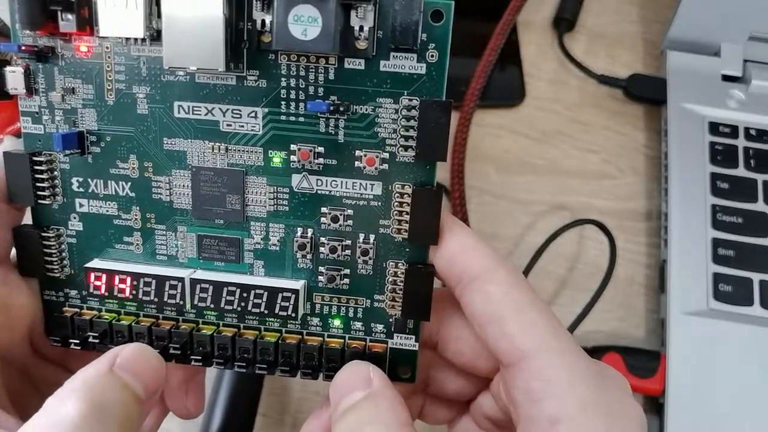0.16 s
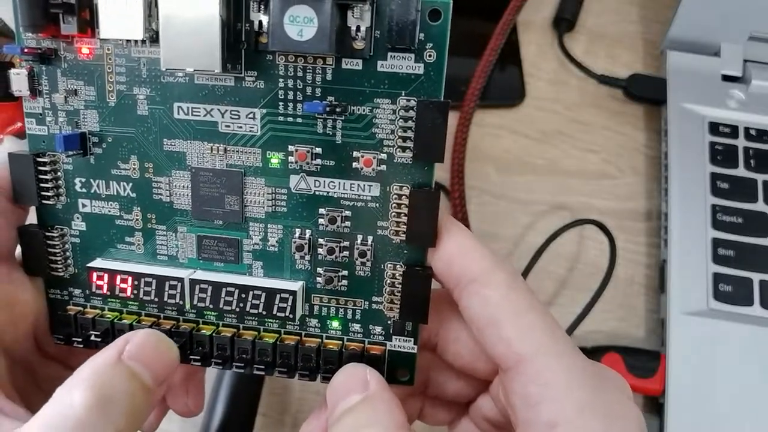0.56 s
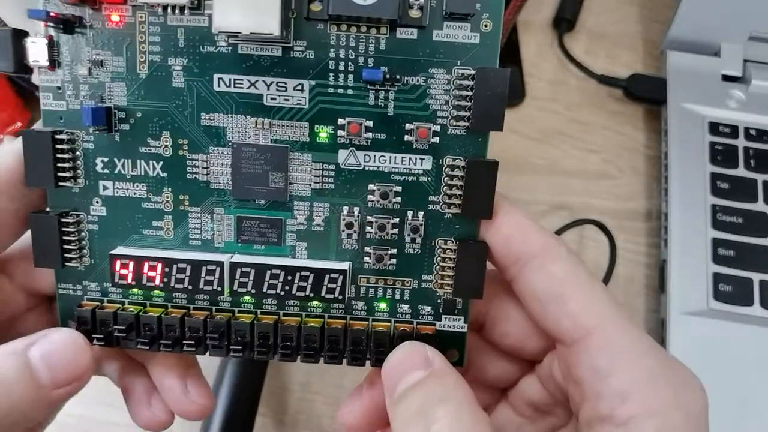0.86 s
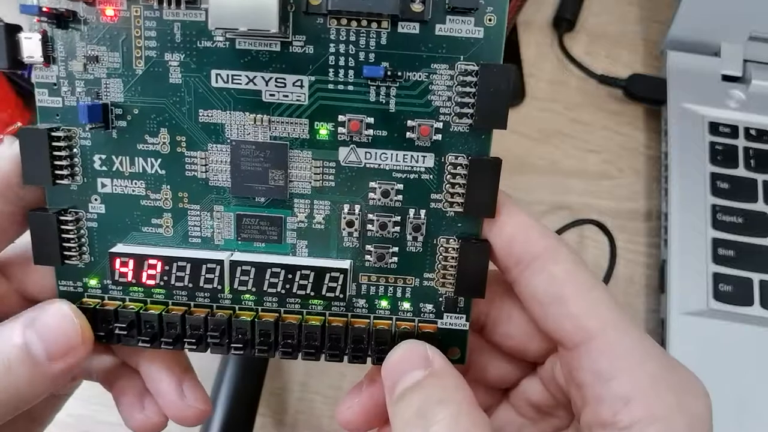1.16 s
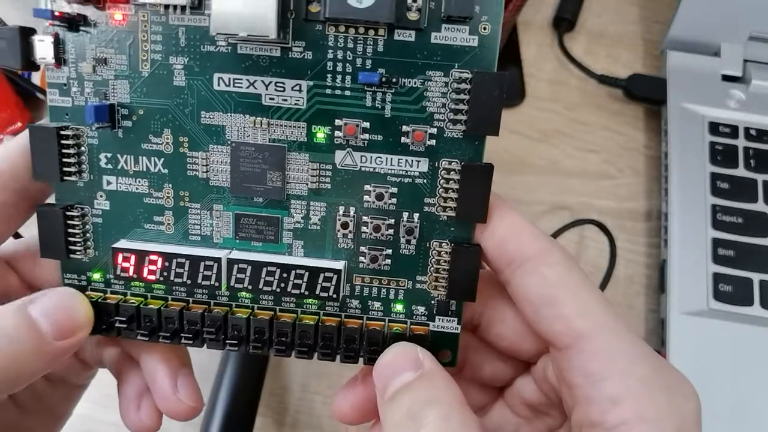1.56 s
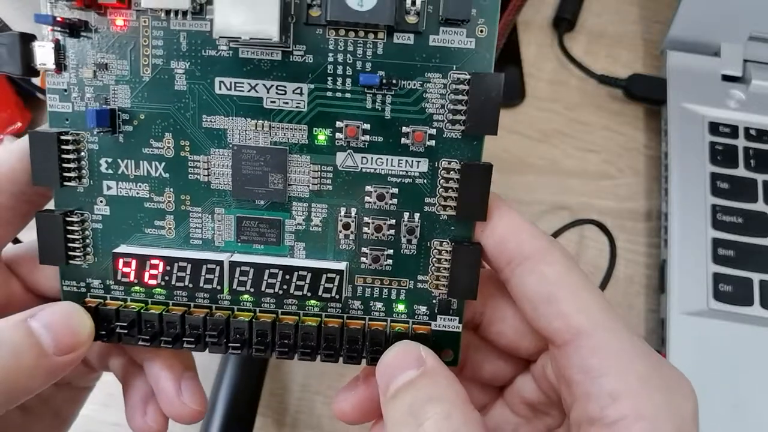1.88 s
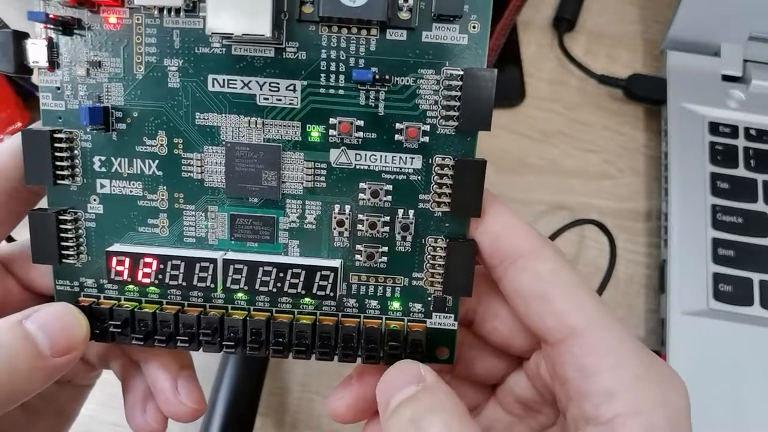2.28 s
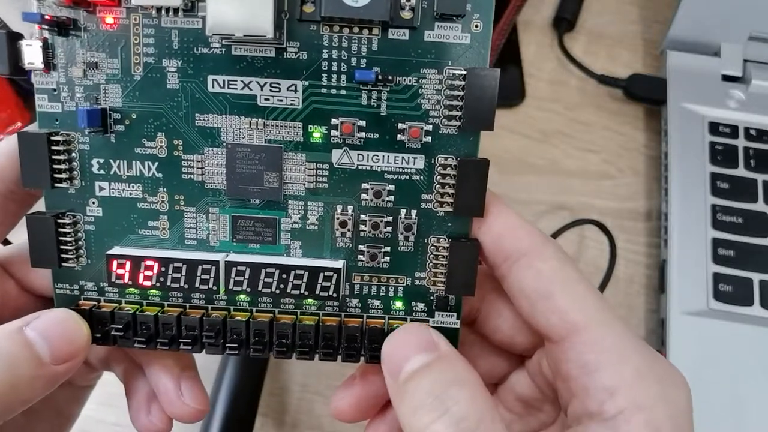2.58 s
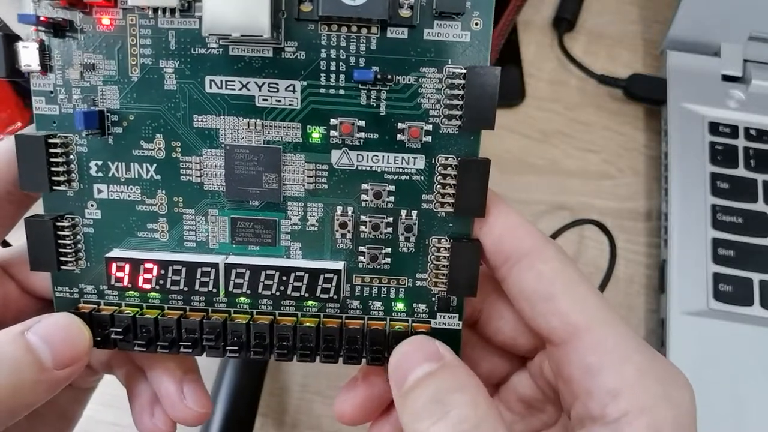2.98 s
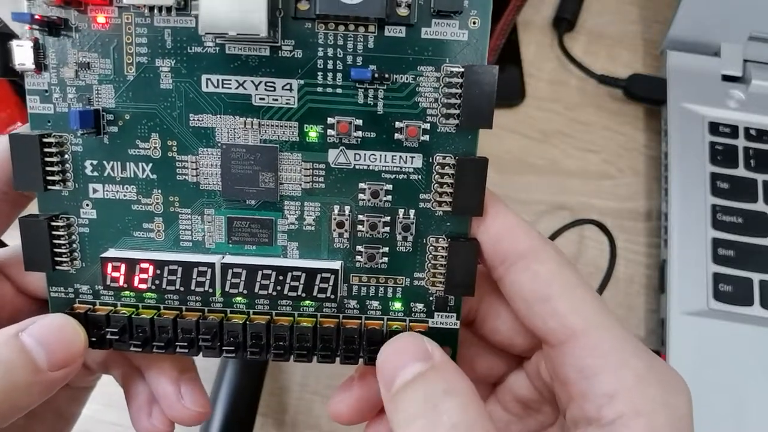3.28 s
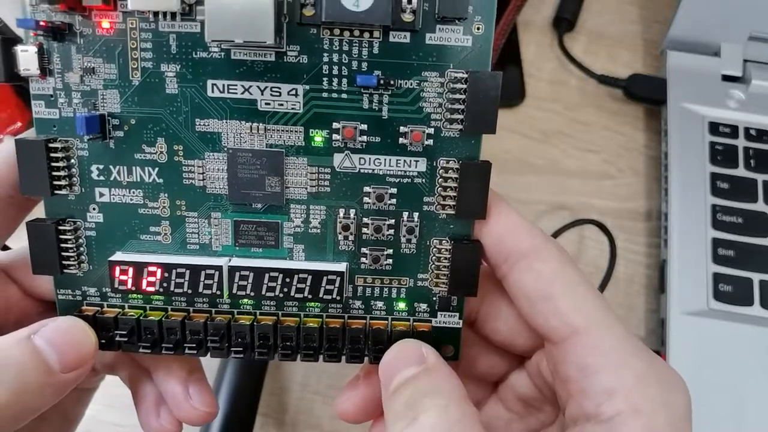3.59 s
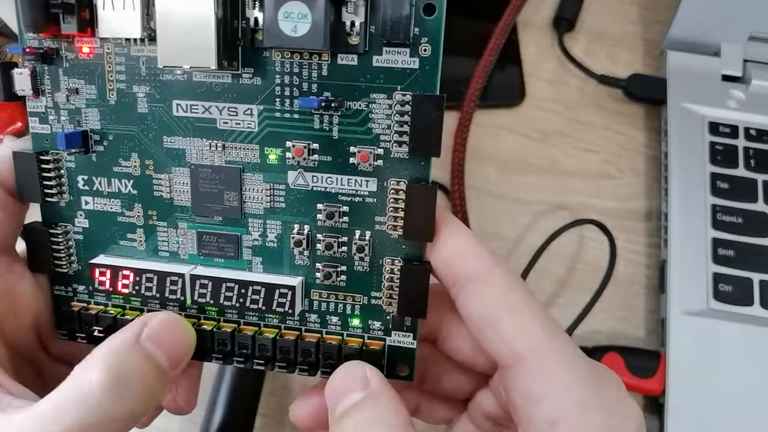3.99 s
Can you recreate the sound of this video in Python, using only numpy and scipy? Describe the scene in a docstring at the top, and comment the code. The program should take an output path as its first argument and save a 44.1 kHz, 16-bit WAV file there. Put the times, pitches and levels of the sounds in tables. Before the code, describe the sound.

A quiet low hum and the soft rush of ventilation fill a small room. Close to the microphone, little slide switches on a circuit board snap over: two crisp, bright clicks with faint ticks around them, a gap, then a third click. Skin barely brushes the board before the first click and after the last, and the room adds a short reverberation.

```python
"""In a small room, tiny slide switches are flipped by thumb on a hand-held circuit board near the microphone.
A faint mains hum, two low drones and the rumble, air noise and fan of the ventilation sound throughout.
Skin brushes the board before and after the flips, making friction noise. Each slider scrapes, snaps over
its detent and hits its end stop; the impacts excite the board's damped modes, and the room reverberates."""
import sys
import numpy as np
from scipy import signal
from scipy.fft import rfft, irfft, next_fast_len
from scipy.io import wavfile
from scipy.ndimage import uniform_filter1d

SR = 44100
rng = np.random.default_rng(int(sys.argv[2]) if len(sys.argv) > 2 else 0)


def generate_wav(signal):
    """Clip the signal to [-1, 1] and save it as 16-bit WAV at the path in sys.argv[1]."""
    frames = np.transpose(np.atleast_2d(signal))
    scaled = np.clip(frames, -1, 1) * 32767
    pcm = np.round(scaled).astype(np.int16)
    wavfile.write(sys.argv[1], SR, pcm)


N = 182574
TIME = np.arange(N) / SR
EARS = np.array([[.5], [-.5]])  # each ear's share of a left-minus-right (L-R) difference


def undb(db):
    """Amplitude ratio of a level in decibels."""
    return 10 ** (np.asarray(db) / 20)


def unit(x):
    """Normalisation to rms 1."""
    return x / np.sqrt(np.mean(x ** 2))


def across(rows, hz, column=1):
    """Interpolation of a table column over log frequency."""
    rows = np.array(rows)
    return np.interp(np.log(np.maximum(hz, 1)), np.log(rows[:, 0]), rows[:, column])


def shape(x, rows):
    """Minimum-phase filtering through points (f/Hz, gain/dB)."""
    size = 2 * next_fast_len(x.shape[-1])
    gain = undb(across(rows, np.fft.rfftfreq(size, 1 / SR)))
    cepstrum = irfft(np.log(gain))
    cepstrum[1:size // 2] *= 2
    cepstrum[size // 2 + 1:] = 0
    return irfft(rfft(x, size) * np.exp(rfft(cepstrum)))[..., :x.shape[-1]]


def balance(ears, rows):
    """Interaural level difference by frequency, from a table's last column."""
    return np.array([shape(ear, [(row[0], share * row[-1]) for row in rows])
                     for ear, share in zip(ears, EARS[:, 0])])


def fade(t, t60):
    """Exponential decay by 60 dB in t60 seconds, silent before t = 0."""
    return (t >= 0) * np.exp(-np.log(1000) * np.maximum(t, 0) / t60)


def walk(rate_hz):
    """Smoothed random steps: a slow drift of rms 1."""
    k = int(SR / rate_hz)
    steps = np.repeat(rng.standard_normal(N // k + 1), k)
    return unit(uniform_filter1d(uniform_filter1d(steps, k), k)[:N])


def bell(x, centre, width):
    """Gaussian curve of height 1."""
    return np.exp(-.5 * ((x - centre) / width) ** 2)


def swells(rows, steady_db, column=2):
    """Power addition of a steady level and Gaussian swells, returned as a gain."""
    power = sum((undb(row[column]) * bell(TIME, row[0], row[1])) ** 2 for row in rows)
    return np.sqrt(undb(steady_db) ** 2 + power)


def add(out, x, start_s):
    """Superposition of a sound from a given time on."""
    i = int(start_s * SR)
    out[:, i:i + x.shape[1]] += x[:, :N - i]


def tones(lines, waver_hz=7):
    """Sinusoids under random amplitude and phase modulation."""
    out = 0
    for hz, db, depth in lines:
        waver = 1 + depth * (walk(waver_hz) + 1j * walk(waver_hz))
        carrier = np.exp(2j * np.pi * (hz * TIME + rng.random()))
        out = out + undb(db) * unit(np.real(waver * carrier))
    return out


# the two drones: (f/Hz, relative level/dB, modulation depth)
LOW_DRONE = [(54.3, -0.87, .12)]
UPPER_DRONE = [(63.2, 1.5, 0.14)]
# their swells: (t/s, half length/s, low drone gain/dB, upper drone gain/dB)
DRONE_SWELLS = [(.04, .055, -35.5, -49), (.23, 0.043, -40, -52), (.62, 0.14, -41.5, -60),
                (3.25, 0.28, -47, -62), (3.85, 0.18, -51, -49.5)]
# mains overtones: (f/Hz, level/dB, modulation depth)
MAINS_LINES = [(102.7, -57, 0.28), (149.9, -60.5, 0.93)]


def hum(pan_db=3.5):
    """Beating: two swelling drones, close in frequency, interfere beneath the mains overtones."""
    low = tones(LOW_DRONE) * swells(DRONE_SWELLS, steady_db=-49.2)
    upper = tones(UPPER_DRONE) * swells(DRONE_SWELLS, steady_db=-62, column=3)
    ease_in = np.minimum(TIME / .004, 1)
    return ease_in * (low + upper + tones(MAINS_LINES)) * undb(pan_db * EARS)


# stereo image of the background noise: (f/Hz, side minus mid/dB, L-R/dB)
NOISE_IMAGE = [(58.5, -19, 0.5), (128.5, -19.5, -1), (251.5, -9.5, 0), (404, -4, 2), (694, -5, 0.5),
               (1133, 5, -0.5), (1656, -1, 2.5), (2170, -1.5, -2.5), (2630, 3, -7.5), (3250, 5.5, -4),
               (4000, -4.5, 2), (4520, 2.5, -5), (5300, -1.5, -0.5), (6540, 2, 0.5), (11960, 0, -1.5)]


def diffuse(spectrum):
    """Diffuse-field noise: coherent between the ears in the bass, largely incoherent in the treble."""
    mid, side = unit(shape(rng.standard_normal((2, N)), spectrum))
    return balance(mid + 2 * EARS * shape(side, NOISE_IMAGE), NOISE_IMAGE)


def settle(rest_db, extra_db, settle_s):
    """Gaussian fall of a level in dB to its resting value."""
    return rest_db + extra_db * np.exp(-(TIME / settle_s) ** 2)


# spectra of the rumble, the moving air and a small fan: (f/Hz, relative density level/dB)
RUMBLE_SPECTRUM = [(15, -18.5), (28, -1), (42, -2), (60, 0.5), (78, -4), (95, -2), (135, 0.5), (175, -4),
                   (240, -5), (310, -9), (390, -26.5), (900, -56)]
AIR_SPECTRUM = [(200, 0), (400, 1.5), (540, 2.5), (650, 1), (750, 2), (880, 1), (1000, -5.5), (1200, -8.5),
                (1320, -5.5), (1700, -7.5), (2200, -14.5), (3300, -29), (4500, -30.5), (9000, -58)]
FAN_SPECTRUM = [(1000, -24), (2150, -6.5), (2500, -3), (2850, -4), (3100, -14.5), (3700, -11.5),
                (4000, -10.5), (4750, -28.5), (5200, -17.5), (6000, -28), (7000, -35), (8200, -26),
                (11000, -26), (15500, -23.5)]
# swells of the rumble and the air: (t/s, half length/s, gain/dB)
RUMBLE_SWELLS = [(1.87, 0.15, -49), (3.9, 0.041, -48.5)]
AIR_SWELLS = [(3.85, 0.23, -63)]


def ventilation(flutter_db=1.5, fan_db=-68.5):
    """Broadband flow noise: rumble and air settle and briefly swell, while a small fan whirrs evenly."""
    rumble_gain = swells(RUMBLE_SWELLS, settle(rest_db=-51, extra_db=4.55, settle_s=0.86))
    air_gain = swells(AIR_SWELLS, settle(rest_db=-61, extra_db=4.8, settle_s=1.22))
    rumble = diffuse(RUMBLE_SPECTRUM) * rumble_gain * undb(flutter_db * walk(14))
    air = diffuse(AIR_SPECTRUM) * air_gain * undb(0.319 * walk(7.64))
    fan = unit(diffuse(FAN_SPECTRUM)) * undb(fan_db + 0.268 * walk(21))
    return rumble + air + fan


# resonances in the moving air: (f/Hz, bandwidth/Hz, relative level/dB)
AIR_RESONANCES = [(405.4, 27, -2.5), (497.5, 29, -8.5), (647.6, 23, 3), (890, 110, 0.5)]


def hollow_air(start_db=-56.5, fade_db_per_s=5.5):
    """Resonance: narrow bands of the air noise ring with a hollow sound that slowly fades."""
    air = diffuse(AIR_SPECTRUM)
    ring = sum(undb(db) * unit(signal.lfilter(*signal.iirpeak(hz, hz / width_hz, fs=SR), air))
               for hz, width_hz, db in AIR_RESONANCES)
    return unit(ring) * undb(start_db - fade_db_per_s * TIME)


# strokes of skin on the board: (t/s, half length/s, level/dB)
RUBS = [(0.868, 0.063, -71), (3.91, 0.11, -71.5)]
# spectrum of sliding skin: (f/Hz, relative level/dB)
SKIN_SPECTRUM = [(1500, -19), (3500, -0.5), (6000, -10), (8500, -4), (11000, -18), (13000, -12),
                 (16000, -22)]


def thumb(grain_db=2):
    """Friction noise: skin slides over the board in soft, grainy swells."""
    swell = sum(undb(db) * bell(TIME, middle_s, half_s) for middle_s, half_s, db in RUBS)
    grain = undb(grain_db * walk(150))
    return swell * grain * unit(shape(rng.standard_normal((2, N)), SKIN_SPECTRUM))


def impact(t, tick_db=4, tick_t60=0.0013, chatter_t60=0.01, bounce_s=0.00075, bounce_db=-5):
    """Force envelope of an impact: a sharp tick, its bounce and a short chatter."""
    ticks = fade(t, tick_t60) + undb(bounce_db) * fade(t - bounce_s, tick_t60)
    return fade(t, chatter_t60) + undb(tick_db) * ticks


def chatter(force):
    """Broadband excitation: tiny random impacts follow a force envelope, whitened to a flat spectrum."""
    impacts = force * rng.standard_normal(len(force))
    hz = np.fft.rfftfreq(len(force), 1 / SR)
    power = uniform_filter1d(np.abs(rfft(impacts)) ** 2, size=24)
    return shape(impacts, np.column_stack([hz, -10 * np.log10(power)])[1:])


# crack of plastic on plastic: (f/Hz, relative level/dB)
CRACK_SPECTRUM = [(100, -16), (300, -4.5), (550, -2.5), (800, -17), (1400, -17), (2300, -15), (3600, -1),
                  (7000, 0), (11000, 3), (15000, 7.5), (16500, -6)]


def crack(t):
    """A brief contact has a broad spectrum: one filtered impulse."""
    return shape(signal.unit_impulse(len(t)), CRACK_SPECTRUM)


# modes of the board and switch housings: (f/Hz, relative level/dB, T60/s, L-R/dB)
BOARD_MODES = [ (295.2, -8.5, 0.0424, -6.5), (752.5, -13, 0.047, -3), (1070, -19, .025, -4),
               (1630, -12, 0.019, -14.5), (1918, -16, 0.025, -1), (2877, -4.5, 0.0202, -5.5),
               (3690, -4.5, 0.00967, -7), (3900, 2, 0.014, -4), (4113, -8.5, .018, -4),
               (5594, -4.5, 0.015, -6.5), (6347, 1.5, 0.012, -5), (6850, -1.5, 0.017, 3.5),
               (7640, 3.5, 0.014, 2), (8540, 3, 0.019, 4), (9400, -2.5, 0.017, -1.5),
               (9800, 1.5, 0.016, -1), (10830, -1, 0.01214, 2), (12200, -7, 0.0092, 1.5),
               (13260, 3.5, 0.012, 2), (14370, 2.5, 0.0091, 1.5), (15230, 1, 0.015, 0.5), ]


def board(t, ring_db):
    """Modal superposition: the board's impulse response is a crack plus damped cosines."""
    ring = sum(undb(db + pan_db * EARS) * np.cos(2 * np.pi * hz * t) * fade(t, t60)
               for hz, db, t60, pan_db in BOARD_MODES)
    return unit(crack(t)) + undb(ring_db) * unit(ring)


def touch(click, db, tilt_db, bands, tilt_from_hz=930):
    """Spectral weighting: a softer touch dulls the treble; place and grip favour or damp some bands."""
    hz = np.geomspace(100, SR / 2, 400)
    softness = tilt_db * np.log2(np.maximum(hz / tilt_from_hz, 1))
    place = sum(lift_db * bell(np.log2(hz / centre_hz), 0, octaves)
                for centre_hz, octaves, lift_db in bands)
    click = shape(click, np.column_stack([hz, softness + place]))
    return undb(db) * unit(click) * np.sqrt(.01 * SR / click.shape[1])  # energy of 10 ms at level db


# stereo width of a click, narrow in the bass: (f/Hz, side minus mid/dB)
CLICK_WIDTH = [(300, -12), (1500, -2.5), (4000, 2), (8000, 1), (14000, -0.5)]
# flips, light ticks and taps: (snap t/s, end stop t/s, rebound t/s, stop re snap/dB, rebound re snap/dB,
# scrape re snap/dB, level/dB, ring re crack/dB, treble tilt/(dB per octave), L-R/dB, room send/dB,
# bands [(f/Hz, width/octaves, gain/dB)])
FLIPS = [ (1.1526, 1.1527, 1.1556, 2, 3, -24, -51, 1, -6.5, 2, -1, [(300, 0.5, -18), (4300, 0.068, 7),
         (7760, 0.2, 13.5)]), (1.31, 1.311, 1.31275, 4.5, -2, -6.5, -23, 5, 2, -0.17, 0, [(700, .9, 2.5),
         (1710, 0.39, -4), (3854, 0.1, 5), (6300, .2, 1.5), (10440, 0.15, -2.5), (13050, .06, 4.5)]),
         (1.7179, 1.7206, 1.7215, 6, 6, -6.5, -27, -2, 0, -1, 0.2, [(290, .35, 8.5), (755, .13, 6),
         (1135, .3, -6.5), (1780, 0.11, 5), (4400, 0.1, 5), (4630, 0.025, -7), (6500, .1, -6)]),
         (1.443, 1.437, 1.4405, 2, -6, -12, -61, -3, -6, 0, 0, [(8000, 0.58, -1)]),
         (2.114, 2.114, 2.1156, -1.5, -10, -24.5, -48.5, -1.5, -16, -0.69, 5, [(366, .4, -4),
         (1760, 0.13, 12), (8000, 0.17, 15)]),
         (3.7128, 3.7106, 3.7125, -2, -6, -22, -31.5, -5, -1.15, -0.8, -1.9, [(280, 0.29, 7.5),
         (1644, 0.089, 1), (3890, .12, 9.5), (4890, 0.068, -11), (6020, 0.14, 16), (8850, 0.21, 3),
         (11900, 0.12, 0)]), ]


def switches(scrape_rise_s=0.0051, wall_colour_share=0.72, lead_s=.005, length_s=.06):
    """Forced vibration: scrape, snap, stop and rebound drive the board. Gives direct and wall sound."""
    direct, to_walls = np.zeros((2, 2, N))
    t = np.arange(int(length_s * SR)) / SR
    # the walls hear the board from all sides, so no single mode stands out there
    wall_crack = np.tile(crack(t), (2, 1))
    for (snap_s, stop_s, rebound_s, stop_db, rebound_db, scrape_db,
         db, ring_db, tilt_db, pan_db, send_db, bands) in FLIPS:
        now = t + snap_s - lead_s
        contacts = (snap_s, 0), (stop_s, stop_db), (rebound_s, rebound_db)
        contact_power = sum((undb(force_db) * impact(now - s)) ** 2 for s, force_db in contacts)
        scrape = undb(scrape_db) * fade(snap_s - now, scrape_rise_s)  # grows up to the snap
        force = np.sqrt(scrape ** 2 + contact_power)
        drive = chatter(force) + 2 * EARS * shape(chatter(force), CLICK_WIDTH)
        click = signal.fftconvolve(drive, board(t, ring_db), axes=1)[:, :len(t)]
        wall_bands = [(hz, octaves, wall_colour_share * lift_db) for hz, octaves, lift_db in bands]
        add(direct, undb(pan_db * EARS) * touch(click, db, tilt_db, bands), snap_s - lead_s)
        add(to_walls, undb(send_db) * touch(wall_crack, db, tilt_db, wall_bands), stop_s)
    return direct, to_walls


def wall_echo(direct, delay_s=.0135, db=-22):
    """Specular reflection: the nearest wall returns one distinct echo."""
    return undb(db) * np.roll(direct, int(delay_s * SR), axis=1)


# the room's reverberation: (f/Hz, gain/dB, T60/s)
ROOM_DECAY = [(300, -12, 0.44), (1470, -6.5, .45), (2750, 4.5, 0.41), (3218, -8.5, .42), (4200, -7, 0.42),
              (4800, -13.5, 0.46), (5450, -13, .42), (6300, -12.5, 0.47), (8650, -12.5, 0.4),
              (11180, -17.5, 0.31), (14990, -20, 0.29)]


def room(x, build_s=0.00381, band_hz=1000):
    """Reverberation: diffuse reflections build up quickly and decay exponentially, the treble first."""
    t = np.arange(int(.7 * SR)) / SR
    hz = np.fft.rfftfreq(len(t), 1 / SR)
    noise = rfft(rng.standard_normal((2, len(t))))
    build_up = np.minimum(t / build_s, 1) ** 2
    response = 0
    for low in range(0, 18000, band_hz):
        band = (hz >= low) & (hz < low + band_hz)
        envelope = build_up * fade(t, across(ROOM_DECAY, hz[band].mean(), column=2))
        response = response + irfft(noise * band, len(t)) * envelope / np.sqrt(np.sum(envelope ** 2))
    return signal.fftconvolve(x, shape(response, ROOM_DECAY), axes=1)[:, :N]


# the board as heard at the two microphone ports: (f/Hz, L-R/dB)
PORT_BALANCE = [(1500, 1.5), (3800, 3), (6000, -0.5), (9000, -0.5), (13000, 1)]


def scene():
    """Superposition of direct sound, reflections and the background."""
    rub = thumb()
    clicks, to_walls = switches()
    reflections = wall_echo(clicks) + room(to_walls + rub)
    return rub + balance(clicks, PORT_BALANCE) + reflections + ventilation() + hollow_air() + hum()


def record(dry, top_hz=15900):
    """Band limiting: the recorder's steep low-pass filter cuts the highest treble."""
    return signal.sosfilt(signal.ellip(8, .2, 70, top_hz, fs=SR, output="sos"), dry)


dry = scene()
out = record(dry)
generate_wav(out)
```